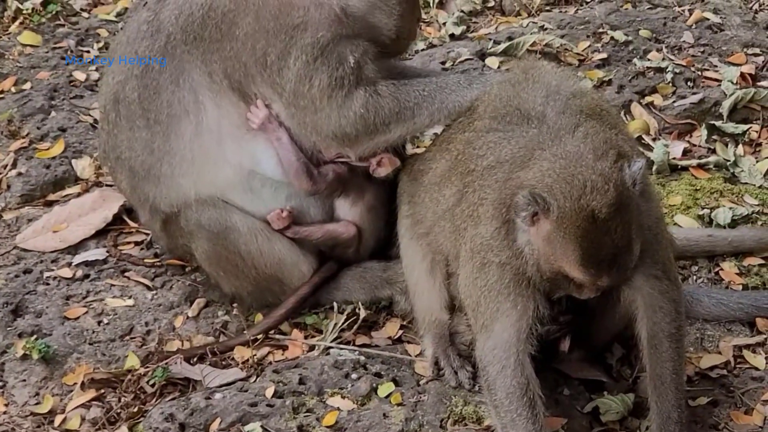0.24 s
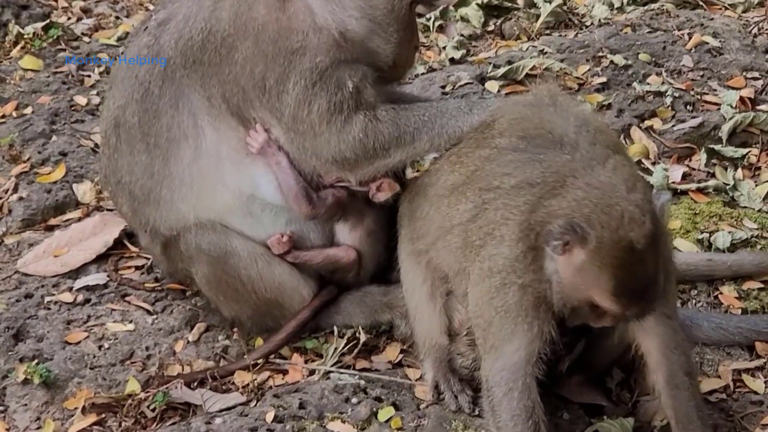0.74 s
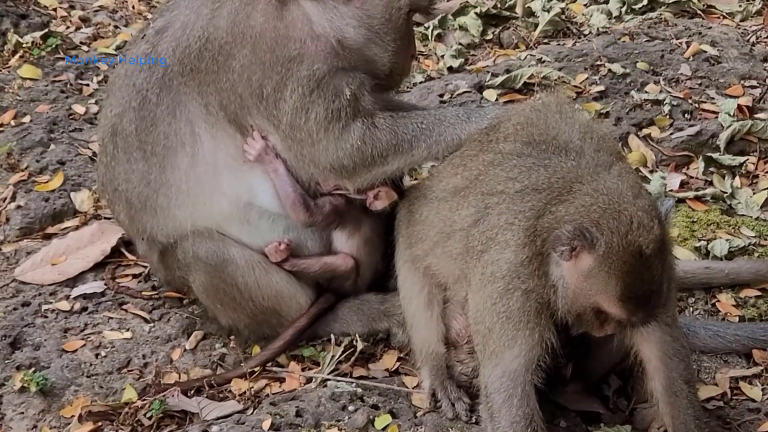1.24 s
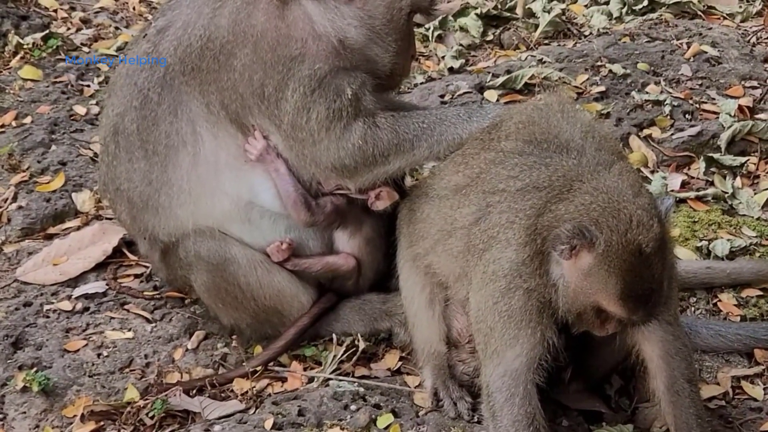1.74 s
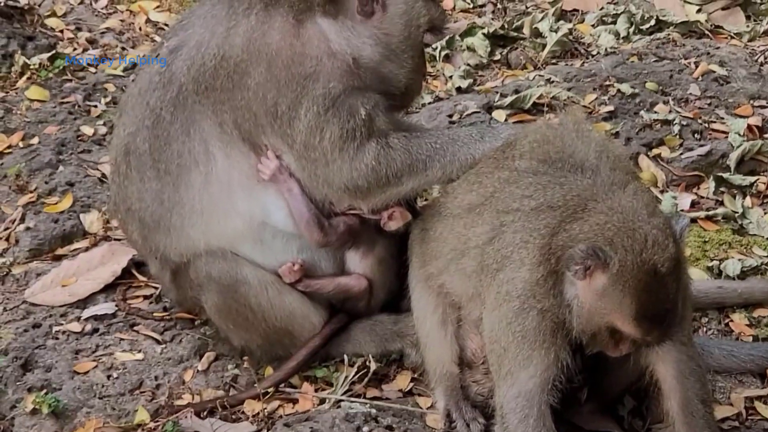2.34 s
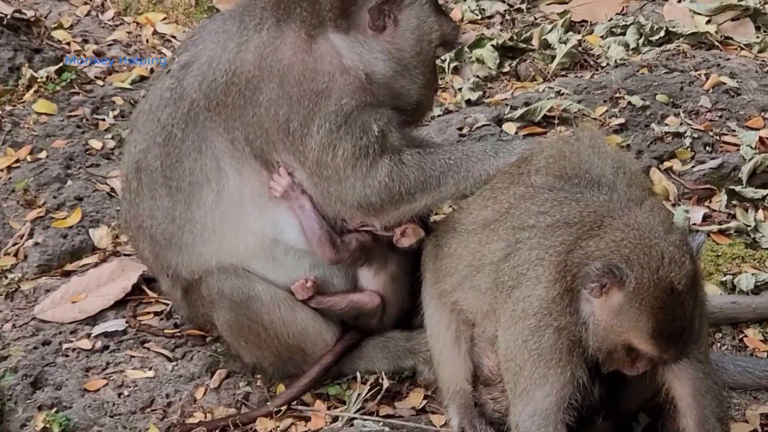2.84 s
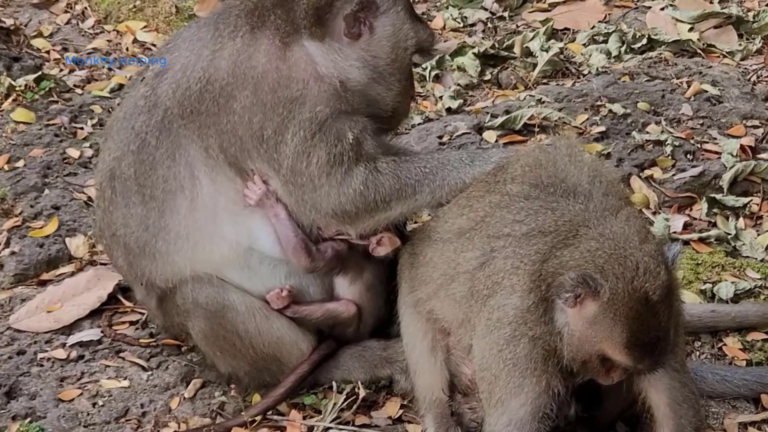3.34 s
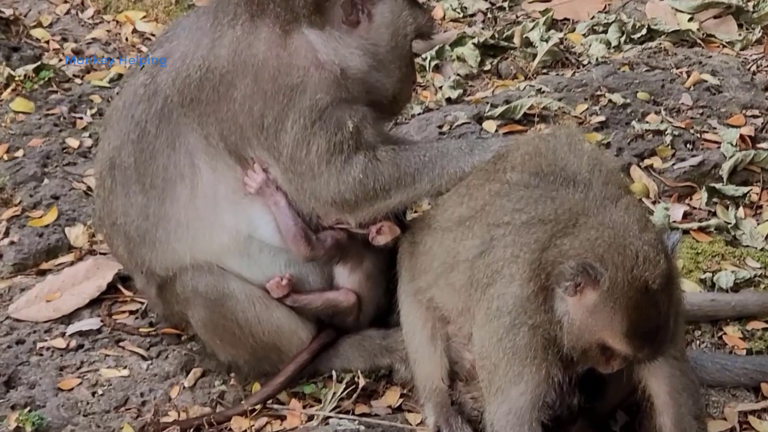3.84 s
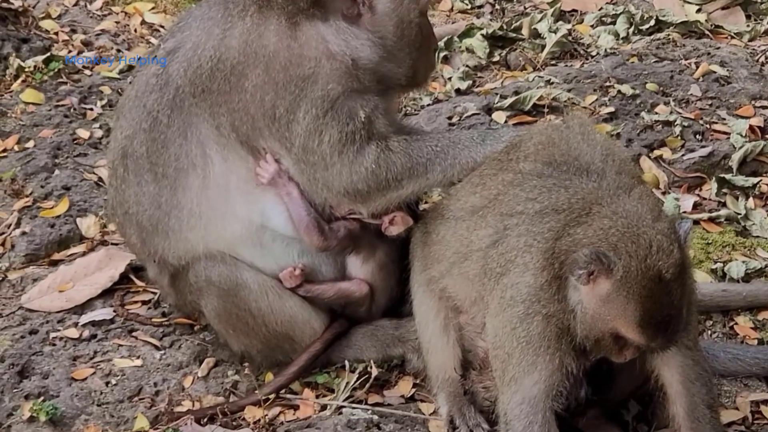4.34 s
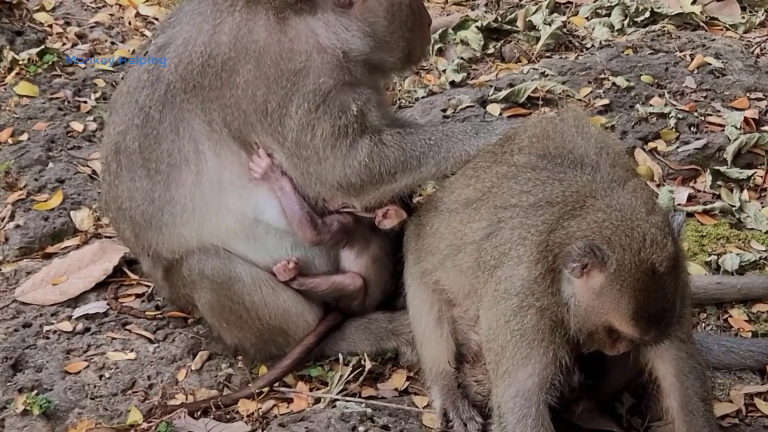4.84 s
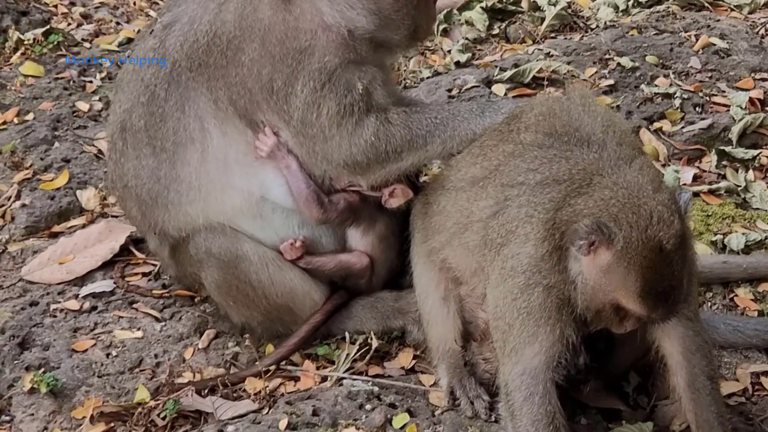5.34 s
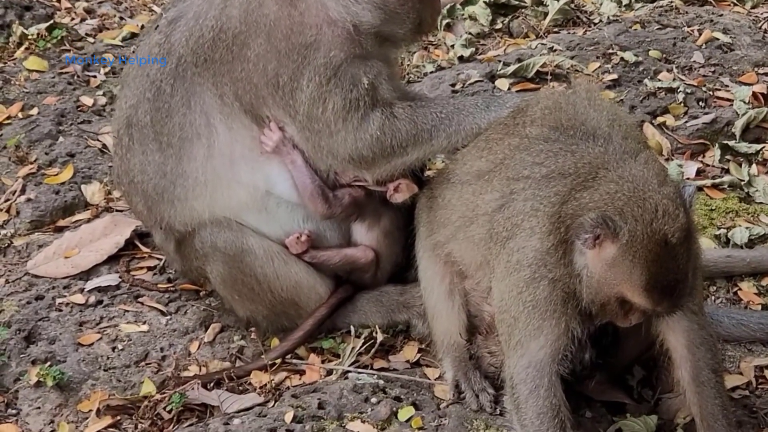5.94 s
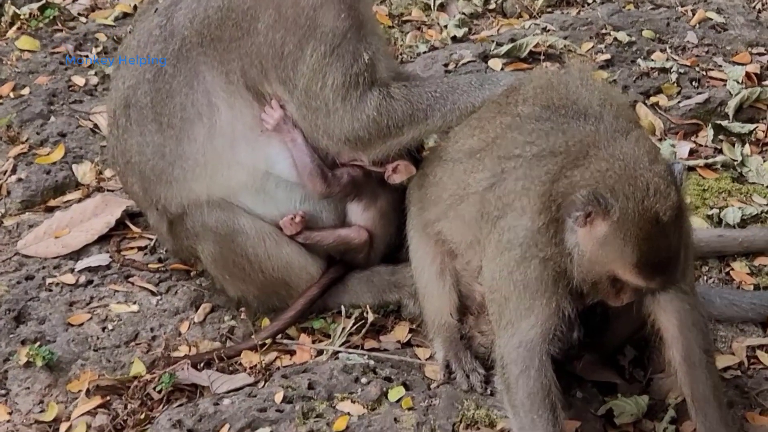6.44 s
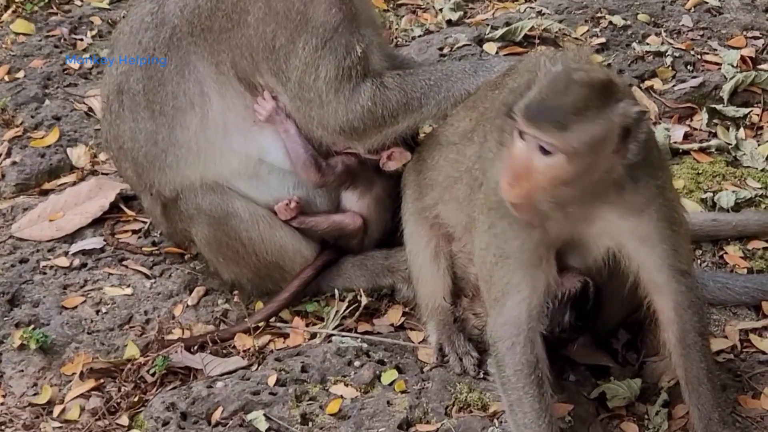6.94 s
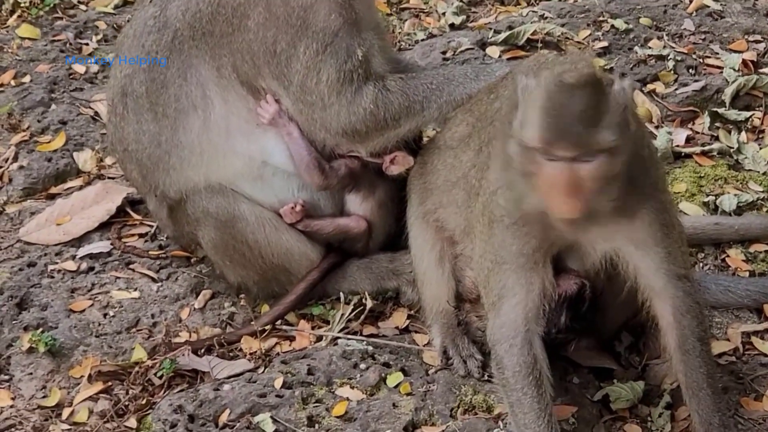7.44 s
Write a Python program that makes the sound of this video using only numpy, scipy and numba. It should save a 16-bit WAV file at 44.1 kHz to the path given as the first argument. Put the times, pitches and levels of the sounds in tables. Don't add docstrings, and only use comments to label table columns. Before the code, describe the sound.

Outdoors among trees, distant traffic drones constantly while leaves crackle close by. A hard dry twig crack comes before the animal calls. A small monkey then gives soft whimpers, a hoarse shrill burst and tiny falling squeaks, its paws thudding softly on the ground. A second later it barks and cries out, high and held, with tiny bird chirps behind. One more crack, then only rustling and rumble. Handheld phone stereo, calls a little right, faint echo from trunks.

```python
import sys
import numpy as np
from scipy import signal
from scipy.fft import rfft, irfft, next_fast_len
from scipy.io import wavfile
from scipy.ndimage import uniform_filter1d
from numba import njit

SR = 44100
rng = np.random.default_rng(int(sys.argv[2]) if len(sys.argv) > 2 else 0)


def output_pcm(signal):
    pcm = np.clip(np.atleast_2d(signal).T, -1, 1) * 32767
    wavfile.write(sys.argv[1], SR, np.round(pcm).astype(np.int16))


def attenuation_scalar(level_db):
    decades = np.asarray(level_db, float) / 20
    return 10 ** decades


N = 339594

# f/Hz, level/dB per Hz
AIR_COLOUR = [(25, -24), (32, 0.5), (50, -4.5), (100, .5), (130, -2), (165, -10.5), (250, -15.5),
              (400, -19), (630, -24), (1250, -28.5), (2000, -26), (3200, -30.5), (5000, -32.5), (8000, -44),
              (12000, -50), (16000, -82)]
# f/Hz, likeness/1
AIR_LIKENESS = [(60, 1), (130, 1), (290, 1), (640, 0.26), (1410, -0.13), (3100, 0.046), (6820, -1.6),
                (15000, -0.06)]
# f/Hz, level/dB per Hz
RUSTLE_COLOUR = [(800, -16), (2000, 1.5), (4000, -3.5), (7000, -1), (10000, -7), (13000, -8), (15500, -33)]
# peak t/s, rise/s, fall/s, level/dB
LEAF_STIRS = [(.174, 0.29, 0.14, -50.5), (.346, .05, .04, -55.5), (.44, .05, .25, -62),
              (.628, .12, .1, -55), (.766, .03, .15, -63), (.924, .25, 0.26, -59.5),
              (1.524, 0.35, .14, -52.5), (1.66, .015, .08, -60), (1.996, .02, .04, -61),
              (2.3, .4, .02, -61), (2.32, 0.025, 0.8, -54), (2.75, .03, .4, -72), (3.054, .08, .02, -60),
              (4.52, 1, .3, -56.5), (4.711, 0.28, 0.14, -58.5), (4.786, .015, 0.07, -51.5),
              (5.032, 0.49, .07, -56.5), (5.15, 0.067, 1, -51.5), (5.7, .8, 0.17, -56.5),
              (5.98, .03, 0.38, -57), (6.218, .03, .08, -71), (6.62, 0.21, .08, -53),
              (6.922, 0.18, 0.11, -62), (7.224, 0.048, 0.19, -58), (7.3, 0.11, 0.44, -62),
              (7.526, 0.031, 0.23, -54.5), (7.652, 0.032, 0.055, -52)]
# start t/s, length/s, level/dB, first f/Hz, last f/Hz
BIRD_WHISTLES = [
    (1.19, .11, -65, 4010, 3400),
    (1.39, .08, -63, 3580, 3980),
    (1.55, .1, -64, 3770, 3730),
    (1.69, .07, -65, 3760, 4060),
    (1.74, .13, -66, 4050, 4080),
    (1.6, .14, -63, 2020, 1990),
    (2.17, .035, -61, 5050, 5550),
    (2.245, .03, -63, 5350, 5450),
]
# share of length spent swelling/1, end fade/dB, glide bend/1
BIRD_KIND = (.3, -3, 1.0)
# t/s, level/dB
CHIRPS = [
    (5.405, -55),
    (5.505, -53),
    (5.555, -55),
    (5.603, -53),
    (5.68, -56),
    (5.718, -57),
]
# t/s, f/Hz, level/dB
CHIRP_PATH = [(0, 4500, -4), (.013, 5000, 2), (.035, 5400, -8)]
# t/s, peak level/dB, f/Hz
KNOCKS = [
    (4.141, -31.5, 263),
    (4.335, -25.5, 277),
    (4.427, -31, 455),
    (5.23, -33.5, 334),
          (0.2, -41.5, 1030),
]
# t/s, peak level/dB, left minus right/dB, decay/s, tilt/dB per octave
TWIG_SNAPS = [(0.2, -34.5, -7, .026, -5), (0.3407, -49, 0.1, .03, -1.5), (1.2887, -40, -4, .025, -5),
              (1.6731, -27, 3, .011, -3), (1.711, -48, -4, .023, -3), (1.994, -44.5, -18, .025, 0),
              (2.3387, -9.5, -6, 0.028, 0.53), (3.0305, -44.5, -4, .028, 0.7), (3.0918, -33, -12, .012, 0),
              (3.2006, -29, -9, .016, 0), (3.2477, -40.5, -5, 0.075, 1.1), (3.358, -31.5, -9, 0.028, -5.5),
              (4.803, -36.5, -13, .02, -8.5), (5.9924, -18, -6.5, 0.027, 0)]
# f/Hz, level/dB per Hz
CRACK_COLOUR = [(800, -17), (2000, 0), (4000, 0.5), (7000, 1), (11000, -1), (14000, 0.5), (16000, -11.5)]
# f/Hz, level/dB
THROAT_COLOUR = [(1800, -3.5), (2700, 0.5), (3800, -18.5), (5500, -8), (6700, -0.5), (7600, -1.7),
                 (9000, -13), (15000, -20.5)]
MOUTH_LOW = [4220, 5160, 6550, 7500]
MOUTH_TOP = [9540, 10240, 10900, 12400, 13600, 15600]
# start t/s, length/s, level/dB, first f/Hz, last f/Hz
WHIMPERS = [
    (3.36, .105, -52, 1740, 2120),
    (3.37, .1, -59, 2740, 3250),
    (3.375, .06, -54, 3170, 3420),
    (3.47, .12, -54, 1730, 1960),
    (3.645, .11, -56, 3320, 2880),
    (3.842, .03, -49, 2230, 1950),
]
# t/s, f/Hz, effort/dB
OPENING = [
    (3.655, 1936, -52),
    (3.672, 1967, -35),
    (3.695, 2062, -31.5),
    (3.71, 2030, -34),
    (3.715, 2224, -29),
    (3.724, 2233, -37),
    (3.745, 2190, -52),
]
# start t/s, length/s, level/dB, first f/Hz, last f/Hz
SCREAM = [
    (3.76, .09, -29.5, 2805, 2696),
]
# start t/s, length/s, level/dB, first f/Hz, last f/Hz
SQUEAKS = [
    (3.97, .036, -29, 4600, 4640),
    (4.002, .056, -29, 4680, 3440),
    (4.208, .028, -31, 3950, 5150),
    (4.332, .03, -37, 3740, 3500),
    (4.377, .033, -37, 3760, 3320),
    (4.408, .03, -34, 2980, 2200),
]
# start t/s, length/s, level/dB, first f/Hz, last f/Hz
BARKS = [
    (5.159, .05, -36, 1925, 1820),
]
# t/s, f/Hz, effort/dB
CRY = [
    (5.25, 1982, -53),
    (5.268, 2080, -35.5),
    (5.288, 2220, -31.5),
    (5.36, 2240, -30.5),
    (5.42, 2283, -31.5),
    (5.478, 2409, -31.5),
    (5.53, 2252, -33.5),
    (5.57, 1897, -35.5),
    (5.58, 1860, -48),
]
# peak t/s, rise/s, fall/s, level/dB, resonance f/Hz
RASPS = [
    (3.86, 0.019, 0.052, -38, 2680),
    (3.909, 0.024, 0.041, -24.5, 2707),
    (3.961, .03, .09, -36.5, 2773),
    (4.217, .012, .05, -31, 2683),
    (4.248, .04, .02, -31.5, 2783),
    (4.422, .008, .05, -31, 2654),
]
# peak t/s, rise/s, fall/s, level/dB, top band against low/dB
HOARSE_BREATH = [(3.794, 0.058, 0.065, -38.5, 2.5), (3.87, .12, 0.043, -40, 7.5),
                 (3.906, 0.045, .05, -35.5, 7.5), (3.955, .014, .11, -26, 3), (4.04, 0.1, 0.12, -41, 2.5),
                 (4.216, 0.014, .03, -35, -9), (4.233, 0.021, 0.049, -30.5, -1),
                 (4.349, 0.027, 0.046, -45, -2), (4.424, .014, 0.049, -27.5, -6),
                 (5.165, 0.0066, 0.032, -40, -8), (5.196, .012, 0.044, -35.5, -13),
                 (5.3, .03, .03, -39, -8), (5.27, 0.063, 0.018, -35, -14), (5.558, 0.071, 0.11, -34.5, -1)]
# share of length spent swelling/1, end fade/dB, glide bend/1, tilt/dB per octave, roughness/0-1
WHIMPER_KIND = (.2, -4, .8, -18, .05)
BARK_KIND = (.2, -14, 1.0, 3, .25)
SCREAM_KIND = (.2, -5, .2, -13, .14)
SQUEAK_KIND = (.2, -9, 1.0, -16, .3)
# tilt/dB per octave, roughness/0-1
OPENING_KIND = (-2.5, 0.074)

MIC_TURN = 0.69
TONE_GAIN_DB = 6.5
EDGE_DB = -20


def shaped(spectrum, x):
    f, db = np.transpose(spectrum)
    n = next_fast_len(x.shape[-1])
    bins = np.fft.rfftfreq(n, 1 / SR) + 1
    gain = attenuation_scalar(np.interp(np.log(bins), np.log(f), db))
    return irfft(rfft(x, n) * gain, n)[..., :x.shape[-1]]


def band(x, hz, width):
    b, a = signal.iirpeak(min(hz, .45 * SR), hz / width, SR)
    return signal.lfilter(b, a, signal.lfilter(b, a, x))


def level(x, db):
    return x * attenuation_scalar(db) / np.sqrt(np.mean(x ** 2))


def walk(rate, size, channels=1):
    k = int(SR / rate)
    steps = np.repeat(rng.standard_normal((channels, size // k + 1)), k, axis=1)
    return 1.29 * uniform_filter1d(uniform_filter1d(steps, k), k)[:, :size]


def fading(depth_db, rate, size):
    return attenuation_scalar(depth_db * (.6 - np.abs(walk(rate, size, channels=2))))


def swell(s, rise, fall, db, colour):
    return [(s - rise, db + EDGE_DB, colour), (s, db, colour), (s + fall, db + EDGE_DB, colour)]


def glide(row, share, fade_db, bend):
    s, length, db, first_hz, last_hz = row
    u = np.linspace(0, 1, num=17)
    hz = first_hz + (last_hz - first_hz) * u ** bend
    start_db = -15
    shape_db = np.interp(u, [0, np.clip(share, .02, .98), 1], [start_db, 0, fade_db])
    return np.transpose([s + length * u, hz, db + shape_db])


def played(table, fade=.004):
    s, *columns = np.transpose(table)
    t = np.arange(int(s[0] * SR), int(s[-1] * SR)) / SR
    gate = np.clip(np.minimum(t - s[0], s[-1] - t) / fade, 0, 1)
    return int(s[0] * SR), gate, [np.interp(t, s, c) for c in columns]


def add(out, start, x):
    out[:, start:start + x.shape[-1]] += x[:, :N - start]


def distance():
    f, alike = np.transpose(AIR_LIKENESS)
    alike = np.clip(alike, 0, .995)
    mid = shaped(np.transpose([f, 10 * np.log10(1 + alike)]), rng.standard_normal(N))
    side = shaped(np.transpose([f, 10 * np.log10(1 - alike)]), rng.standard_normal(N))
    air = level(shaped(AIR_COLOUR, np.array([mid + side, mid - side])), -39) * attenuation_scalar(0.2 * walk(3.22, N))

    drone_hz = 68.4
    engine = level(band(rng.standard_normal(N), drone_hz, 18.4), 0)
    drone = level(np.tanh(4.4 * engine), -36.5)
    road = (air + band(drone, drone_hz, 39)) * attenuation_scalar(np.array([[.4], [-.4]]))

    insects = level(band(rng.standard_normal((2, N)), 6036, 580), -60) * attenuation_scalar(walk(4.1, N))
    return road + insects


def birds():
    out = np.zeros((2, N))
    whistles = [glide(row, *BIRD_KIND) for row in BIRD_WHISTLES]
    chirps = [np.add(CHIRP_PATH, (s, 0, db)) for s, db in CHIRPS]
    for table in whistles + chirps:
        start, gate, (hz, db) = played(table, fade=0.0041)
        turn = rng.uniform(0, 2 * np.pi) + np.array([[0], [MIC_TURN]])
        tone = np.sqrt(2) * np.sin(2 * np.pi * np.cumsum(hz) / SR + turn)
        add(out, start, gate * attenuation_scalar(db + TONE_GAIN_DB) * fading(6.2, 60, len(hz)) * tone)
    return out


def leaves():
    crackle_db = 0.64 * rng.exponential(size=(2, N)) + 0.62 * walk(30, N)
    grains = rng.standard_normal((2, N)) * attenuation_scalar(crackle_db / 1)
    t = np.arange(N) / SR
    rest_db = -73
    power = attenuation_scalar(2 * rest_db)
    for s, rise, fall, db in LEAF_STIRS:
        away = np.maximum((s - t) / rise, (t - s) / fall)
        power = power + attenuation_scalar(2 * (db + EDGE_DB * away))
    return level(shaped(RUSTLE_COLOUR, grains), 4.5) * np.sqrt(power)


@njit
def wood(x, lags, gain, damp):
    line, soft, out = np.zeros((8, 4096)), np.zeros(8), np.zeros((2, len(x)))
    for i in range(len(x)):
        total = 0.
        for k in range(8):
            soft[k] += (1 - damp) * (gain[k] * line[k, (i - lags[k]) & 4095] - soft[k])
            total += soft[k]
            out[k % 2, i] += soft[k]
        for k in range(8):
            line[k, i & 4095] = x[i] + soft[k] - total / 4
    return out


def knocks():
    out, t = np.zeros((2, N)), np.arange(4096) / SR
    for s, db, hz in KNOCKS:
        ring = level(band(rng.standard_normal((1, len(t))), hz, 0.77 * hz), db - 5.5)
        blow = ring * attenuation_scalar(-60 * t / 0.098)
        add(out, int(s * SR), blow * np.ones((2, 1)))
    return out


def snaps():
    out, t = np.zeros((2, N)), np.arange(8192) / SR
    for s, db, pan_db, decay_s, tilt_db in TWIG_SNAPS:
        hz = 5940 * 2 ** (0.45 * tilt_db)
        noise = rng.standard_normal(len(t)) + 1.2 * rng.standard_normal((2, len(t)))
        colour = [(f, g + tilt_db * np.log2(f / 5000)) for f, g in CRACK_COLOUR]
        crack = level(shaped(colour, noise), 0) + level(band(noise, hz, 0.5 * hz), -8.0)
        splinter = np.minimum(t / 0.0014, 1) * attenuation_scalar(-60 * np.maximum(t - .004, 0) / decay_s)
        rattle = attenuation_scalar(-3.0 - 60 * t / (9.3 * decay_s))
        sides_db = np.array([[pan_db], [-pan_db]]) / 2
        add(out, int(s * SR), crack * (splinter + rattle) * attenuation_scalar(db - 15.5 + sides_db))
    return out


def sideways(hz):
    pan_db = np.interp(hz, [2500, 7000], [.5, -6.0])
    return attenuation_scalar(np.array([pan_db, -pan_db]) / 2)


def throat(hz):
    f, db = np.transpose(THROAT_COLOUR)
    notch_hz, notch_width_hz, notch_db = 2340, 28, -20
    notch = notch_db * np.exp(-((hz - notch_hz) / notch_width_hz) ** 2)
    return np.interp(np.log(hz), np.log(f), db) + notch


def turbulence(centres, pan_hz, size):
    pulse = attenuation_scalar(3.5 * walk(220, size))
    out = 0
    for hz in centres:
        air = rng.standard_normal(size) + 1.2 * rng.standard_normal((2, size))
        tilt_db = -14 * np.log2(hz / pan_hz) ** 2
        out = out + level(band(air * pulse, hz, .1 * hz), tilt_db) * fading(6, 70, size)
    return level(np.array([out[0], np.roll(out[1], 1)]), 0) * sideways(pan_hz)[:, None]


def voice(out, table, tilt_db, rough):
    start, gate, (hz, effort_db) = played(table)
    size = len(hz)
    phase = 2 * np.pi * np.cumsum(hz * (1 + 0.06 * rough * walk(252, size)[0])) / SR
    for k in range(1, 8):
        db = effort_db + throat(k * hz) + tilt_db * np.log2(k) + TONE_GAIN_DB
        flutter = fading(2.5 + k + 8 * rough, 110, size)
        beating = (0.57 + 0.19 * k) * walk(117.4, size, channels=2)
        turn = rng.uniform(0, 2 * np.pi) + np.array([[0], [MIC_TURN]]) + beating
        tone = np.sqrt(2) * np.sin(k * phase + turn) * (k * hz < 15000)
        add(out, start, gate * attenuation_scalar(db) * flutter * sideways(k * hz) * tone)
    leak = level(band(rng.standard_normal((2, size)), 3 * hz.mean(), 4500), -12)
    leak_db = effort_db + throat(3 * hz) + tilt_db * np.log2(3)
    add(out, start, gate * attenuation_scalar(leak_db) * leak * sideways(3 * hz))


def rasps(out):
    for row in RASPS:
        start, gate, (db, hz) = played(swell(*row))
        noise = rng.standard_normal((2, 2, len(hz)))
        slow = uniform_filter1d(uniform_filter1d(noise, 110), 80)
        phase = 2 * np.pi * np.cumsum(hz) / SR
        rasp = slow[0] * np.sin(phase) + slow[1] * np.cos(phase)
        add(out, start, gate * attenuation_scalar(db) * level(rasp, 1.7))


def hoarse_breath(out):
    for row in HOARSE_BREATH:
        start, gate, (db, top_db) = played(swell(*row))
        low = turbulence(MOUTH_LOW, 6400, len(gate))
        top = turbulence(MOUTH_TOP, 8800, len(gate))
        add(out, start, gate * attenuation_scalar(db - 1.26) * (low + attenuation_scalar(top_db) * top))


def monkey():
    out = np.zeros((2, N))
    calls = [(WHIMPERS, WHIMPER_KIND), (BARKS, BARK_KIND), (SCREAM, SCREAM_KIND), (SQUEAKS, SQUEAK_KIND)]
    for rows, kind in calls:
        for row in rows:
            voice(out, glide(row, *kind[:3]), *kind[3:])
    voice(out, OPENING, *OPENING_KIND)
    cry_db = -4.5
    voice(out, np.add(CRY, (0, 0, cry_db)), tilt_db=0.67, rough=0.117)
    rasps(out)
    hoarse_breath(out)
    return out


def scene():
    far = distance()
    far = np.array([np.roll(far[0], 20), far[1]])
    near = monkey() + snaps() + knocks() + birds()
    lags = rng.integers(500, 3600, 8)
    echo_t60_s, echo_db = 1.35, -17
    echo = wood(near[0] + 1e-18, lags, attenuation_scalar(-60 * lags / SR / echo_t60_s), .55)
    return near + attenuation_scalar(echo_db) * echo + leaves() + far


def roll_off(x):
    return signal.sosfilt(signal.butter(12, 16670, fs=SR, output="sos"), x)


def record(dry):
    top_hz = 15800
    low_pass = signal.ellip(8, .2, 60, top_hz, fs=SR, output="sos")
    mix = signal.sosfilt(low_pass, dry)
    return roll_off(mix)


dry = scene()
out = record(dry)
output_pcm(out)
```